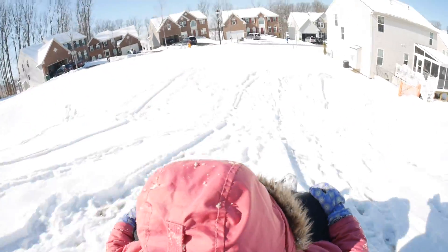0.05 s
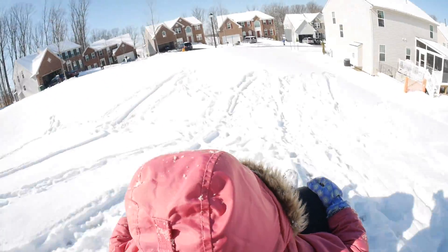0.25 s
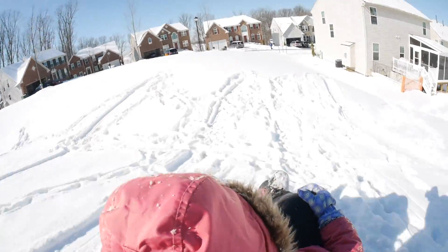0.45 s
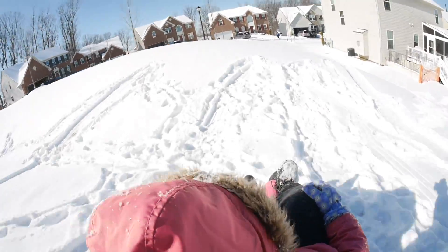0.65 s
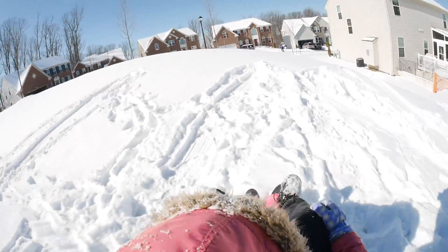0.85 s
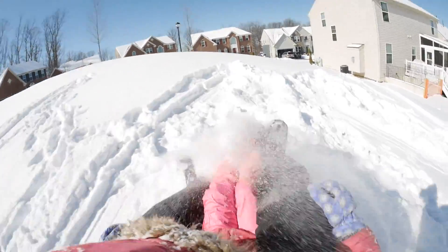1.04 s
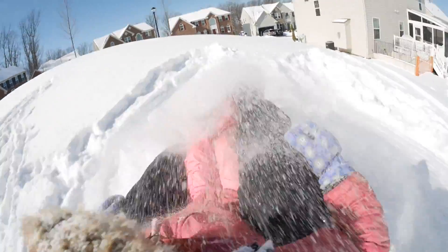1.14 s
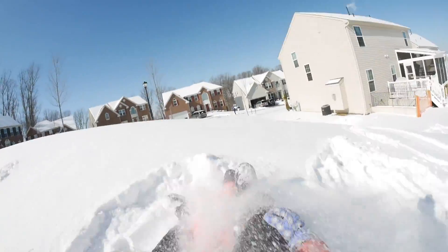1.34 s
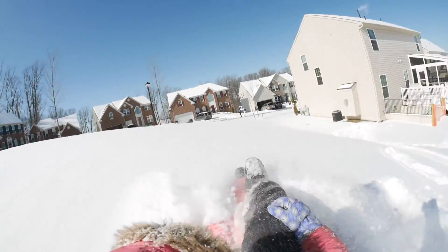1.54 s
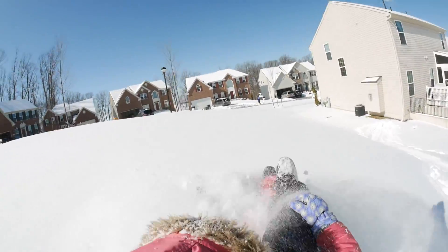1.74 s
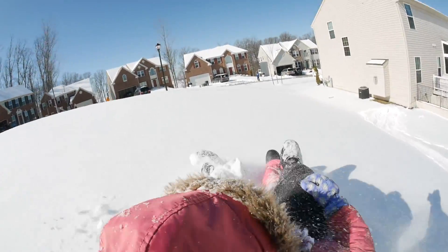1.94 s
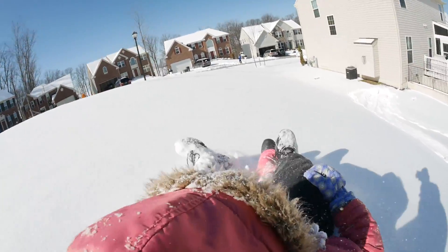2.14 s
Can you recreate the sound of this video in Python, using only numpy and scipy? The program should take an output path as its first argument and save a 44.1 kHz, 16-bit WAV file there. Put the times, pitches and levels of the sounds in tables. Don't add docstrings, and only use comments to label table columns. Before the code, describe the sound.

A plastic sled grinds downhill over lumpy snow with a dull, bumpy, uneven roar and rattles

```python
import sys
import numpy as np
from scipy import signal
from scipy.fft import rfft, irfft
from scipy.io import wavfile
from scipy.ndimage import uniform_filter1d

SR = 44100
rng = np.random.default_rng(int(sys.argv[2]) if len(sys.argv) > 2 else 0)


def transcribe(signal):
    frames = np.atleast_2d(signal).T
    limited = np.clip(frames, -1, 1)
    pcm = np.round(limited * 32767).astype(np.int16)
    wavfile.write(sys.argv[1], SR, pcm)


def invert_db(level):
    return 10 ** (np.asarray(level, dtype=float) / 20)


N = 96623

# (time [s], level [dB], brightness [dB])
HULL_PRESSURE = [(0, -24, -28.5), (.12, -17, -15), (.27, -17.5, -18.5), (.40, -16.5, -8.5),
                 (.57, -18.5, -12.5), (.67, -16.5, -10), (.77, -21, -9), (.85, -13.5, -11.5),
                 (.96, -21.5, -11), (1.0, -18.5, -9.5), (1.18, -16.5, -3), (1.3, -26, -19),
                 (1.40, -29, -16), (1.48, -19.5, -20), (1.68, -21, -13.5), (1.97, -24.5, -19.5),
                 (2.06, -16.5, -16.5), (2.19, -20.5, -20)]
# (time [s], extra level [dB])
BUMPS = [(0.03, 8), (.055, 1), (0.113, 6.5), (0.153, 11.5), (.315, 8), (0.366, -6.5), (.388, 3),
         (.430, 0.5), (0.452, -5), (0.484, 1), (.573, -1), (.658, 0), (0.735, 0.5), (0.778, 5),
         (0.828, 8.5), (.933, 6.5), (0.986, 3), (1.103, 5.5), (1.156, -3), (1.172, 0), (1.434, 9),
         (1.456, 11.5), (1.498, 11.5), (1.531, 9.5), (1.622, 7), (1.690, 11), (1.761, 0.5), (1.838, 7),
         (2.024, 10.5), (2.108, -19)]
# (frequency [Hz], density [dB per Hz])
HULL_SPECTRUM = [(25, -42), (95, -18.5), (230, -3.5), (500, -0.5), (1100, -7), (1900, -18.5), (3400, -42.5),
                 (8000, -73.5), (12000, -88)]
# (frequency [Hz], side minus mid [dB])
HULL_WIDTH = [(40, -15), (230, -17), (700, -15.5), (1600, -12.5), (3600, -4.5)]
# (time [s], level [dB])
SPRAY = [
    (0.0, -46.5),
    (0.06, -65.5),
    (0.24, -70.5),
    (0.83, -65.5),
    (1.01, -70),
    (1.24, -58),
    (1.47, -44.5),
    (1.61, -58.5),
    (1.84, -57),
    (2.19, -60.5),
]
# (frequency [Hz], density [dB per Hz])
POWDER_SPECTRUM = [(2500, -7), (3500, -14.5), (5000, -9), (6400, -7), (8100, -10.5), (10600, -8.5),
                   (13500, -14.5), (15000, -40.5)]
# (time [s], peak [dB])
TICKS_EARLY = [(0.0074, -26.5), (0.014, -16.5), (0.0391, -9.5), (0.0464, -18), (0.0533, -6.5),
               (0.0644, -38), (0.0694, -31), (0.0754, -60), (0.1086, -18.5), (0.114, -25.5), (0.12, -33),
               (0.1304, -30), (0.1511, -33.5), (0.1665, -23.5), (0.1773, -11), (0.1854, -36), (0.1964, -34),
               (0.2049, -45.5), (0.2047, -13), (0.2135, -36.5), (0.2204, -59), (0.2284, -39), (0.2483, -50),
               (0.2824, -24.5), (0.2974, -56), (0.3112, -31), (0.3154, -48), (0.4229, -57.5),
               (0.4229, -33.5), (0.5064, -39)]
TICKS_LATE = [(0.973, -50), (0.9795, -46.5), (0.989, -32.5), (0.9948, -19), (1.009, -31), (1.0124, -42.5),
              (1.062, -28), (1.075, -39), (1.0842, -28.5), (1.1112, -19), (1.1362, -20), (1.1465, -24),
              (1.147, -30.5), (1.1614, -17), (1.1686, -22), (1.175, -41), (1.3232, -32.5), (1.4027, -37),
              (1.4207, -37), (1.4407, -22.5), (1.453, -23.5), (1.473, -34), (1.48, -33.5), (1.5843, -22.5),
              (1.5913, -22), (1.6034, -53), (1.6187, -36.5), (1.9115, -32), (1.9224, -48.5)]
# (start [s], length [s], level [dB])
RATTLES = [(0.042, 0.035, -46), (0.112, 0.022, -58), (.150, 0.068, -48), (0.278, 0.023, -60.5),
           (.405, 0.028, -63), (0.977, 0.035, -53.5), (1.057, 0.055, -51.5), (1.136, 0.045, -46),
           (1.399, 0.097, -57), (1.584, 0.032, -52), (1.911, 0.015, -52)]
# (frequency [Hz], level [dB], T60 [s])
MOUNT_MODES = [(4460, -36, 0.00081), (5560, -17, .004), (6340, -27, 0.0023), (7600, 1.5, 0.0036),
               (8670, -11, 0.0049), (9845, 1, 0.0044), (10700, -2.5, 0.0078), (11250, -25.5, 0.0041),
               (14000, -64, .005)]
# (time [s], peak [dB])
CRUSTS = [(0.1534, -32), (0.3644, -40), (0.3874, -32), (0.403, -13), (0.437, -25), (0.4539, -27),
          (0.499, -18), (0.5142, -20), (0.5724, -29), (0.612, -29), (0.6629, -20.5), (0.688, -18.5),
          (0.7354, -42), (0.773, -28), (0.828, -23.5), (0.933, -27), (1.1014, -8), (1.2021, -11),
          (1.4974, -43), (1.6188, -23), (1.7599, -37.5)]


def rms_one(x):
    return x / np.sqrt(np.mean(x ** 2) + 1e-20)


def in_time(rows):
    time_s, *columns = np.transpose(rows)
    return [np.interp(np.arange(N) / SR, time_s, column) for column in columns]


def at_hz(points):
    bin_hz = np.maximum(np.arange(N // 2 + 1) * SR / N, 1)
    point_hz, value = np.transpose(points)
    return np.interp(np.log(bin_hz), np.log(point_hz), value)


def colour(x, gain):
    return irfft(rfft(x) * gain, N)


def drift(rate_hz):
    pole = np.exp(-2 * np.pi * rate_hz / SR)
    wander = signal.lfilter([1], [1, -2 * pole, pole * pole], rng.standard_normal(N + SR))
    return rms_one(wander[SR:])


def grains(per_s, spread_db):
    size_draw, sign_draw, arrival_draw = rng.random((3, N))
    size_db = spread_db * np.minimum(-np.log(size_draw + 1e-9), 4)
    sizes = invert_db(size_db) * np.sign(sign_draw - .5)
    arrivals = np.clip(per_s / SR - arrival_draw, 0, 1) * SR / per_s
    return rms_one(sizes * np.sqrt(arrivals))


def clicks(rows):
    out = np.zeros(N)
    time_s, level_db = np.transpose(rows)
    np.add.at(out, (time_s * SR).astype(int), invert_db(level_db))
    return out


def dying(x, t60_s):
    return signal.lfilter([1], [1, -invert_db(-60 / (t60_s * SR))], x)


def stereo(mid, side):
    return np.array([mid + side, mid - side])


def hull():
    lumps_per_s, lump_spread_db, smooth_snow_db = 1763, 4, -6
    ring_t60_s, bump_t60_s, bump_bright_ratio = .005, 0.024, 1.77
    mean_bright_db, jolt_low_db, jolt_high_db, sway_depth_db = -14, 0.5, 2.5, 0.26
    t = np.arange(N) / SR

    level_db, bright_db = in_time(HULL_PRESSURE)
    bump_db = np.zeros(N)
    for time_s, extra_db in BUMPS:
        bump_db[int(time_s * SR)] = extra_db
    bump_db = dying(bump_db, bump_t60_s)
    jolt, sway = drift(65), drift(3.0)
    common_db = level_db + sway_depth_db * sway
    low_gain = invert_db(common_db + bump_db + jolt_low_db * jolt)
    high_db = common_db + bump_bright_ratio * bump_db + jolt_high_db * jolt
    high_gain = invert_db(high_db + bright_db - mean_bright_db)

    high_share = np.clip(at_hz([(890, 0), (2350, 1)]), 0, 1)
    mid_shape = invert_db(at_hz(HULL_SPECTRUM))
    mid_shape = mid_shape / np.sqrt(np.mean(mid_shape ** 2))
    side_shape = mid_shape * invert_db(at_hz(HULL_WIDTH))
    narrowing = invert_db(np.interp(t, (1.1, 1.7), [0, -11]))

    parts = []
    for shape, width in ((mid_shape, 1), (side_shape, narrowing)):
        smooth_snow = invert_db(smooth_snow_db) * rng.standard_normal(N)
        knocks = rms_one(grains(lumps_per_s, lump_spread_db) + smooth_snow)
        knocks = knocks / np.sqrt(uniform_filter1d(knocks ** 2, size=1600))
        ring = rfft(rng.standard_normal(N) * invert_db(-60 * t / ring_t60_s))
        smear = shape * ring / (np.abs(ring) + 1e-12)
        low = colour(knocks * low_gain, smear * (1 - high_share))
        high = colour(knocks * high_gain * width, smear * high_share)
        parts.append(low + high)
    return stereo(*parts)


def powder():
    level_db, = in_time(SPRAY)
    shape = invert_db(at_hz([(900, -57)] + POWDER_SPECTRUM))
    mid, side = (rms_one(colour(grains(6300, 1.5), shape)) for _ in "ms")
    gain = invert_db(level_db - 1.2 + 0.66 * drift(25.0))
    return gain * stereo(mid, invert_db(-45) * side)


def rattle_spells():
    edge_s, rattle_db = 0.0039, 5.5
    t = np.arange(N) / SR
    envelope = np.zeros(N)
    for start_s, length_s, level_db in RATTLES:
        inside_s = np.minimum(4 * (t - start_s), start_s + length_s - t)
        envelope += invert_db(level_db + rattle_db) * np.clip(inside_s / edge_s + 1, 0, 1)
    return envelope


def mount():
    contact_rise_s, contact_t60_s, strike_spread_db = .002, .010, 3.5
    mount_db, side_db, left_db = -15, -10, 1.3
    ticks = np.array(TICKS_EARLY + TICKS_LATE)
    spells = rattle_spells()
    out = np.zeros((2, N))
    for part, part_db in enumerate((0, side_db)):
        rough = rng.standard_normal(N)
        chatter = grains(2500, 3.0) * invert_db(5.1 * drift(67.0))
        for mode_hz, level_db, t60_s in MOUNT_MODES:
            uneven = np.outer(rng.standard_normal(len(ticks)), [0, strike_spread_db])
            hits = clicks(ticks + uneven)
            contact = dying(hits, contact_t60_s) - dying(hits, contact_rise_s)
            force = contact * rough * 0.56 + spells * chatter
            r, w = invert_db(-60 / (t60_s * SR)), 2 * np.pi * mode_hz / SR
            ringing = signal.lfilter([0, np.sin(w)], [1, -2 * r * np.cos(w), r * r], force + 1e-18)
            out[part] += invert_db(level_db + part_db) * ringing
    band = signal.butter(5, [4100, 12800], "band", fs=SR, output="sos")
    balance = invert_db(np.array([[1], [-1]]) * left_db)
    return invert_db(mount_db) * stereo(*signal.sosfilt(band, out)) * balance


def crusts():
    crackle = dying(clicks(CRUSTS), 0.01) * grains(3500, 3.5)
    high = signal.butter(2, 1500, "high", fs=SR, output="sos")
    low = signal.butter(3, 4370, "low", fs=SR, output="sos")
    return invert_db(-7) * signal.sosfilt(np.vstack([high, low]), crackle + 1e-18)


def scene():
    return hull() + powder() + mount() + crusts()


def roll_off(x):
    return signal.sosfilt(signal.butter(12, 14710, fs=SR, output="sos"), x)


def record(dry):
    ceiling = 1.1
    rounded = ceiling * np.tanh(dry / ceiling)
    top_cut = signal.cheby1(8, 1, 14100, fs=SR, output="sos")
    bass_cut = signal.butter(2, 35, "high", fs=SR, output="sos")
    mix = signal.sosfilt(np.vstack([top_cut, bass_cut]), rounded)
    return roll_off(mix)


dry = scene()
out = record(dry)
transcribe(out)
```